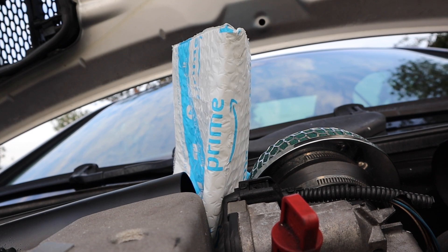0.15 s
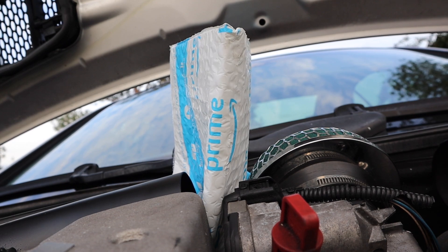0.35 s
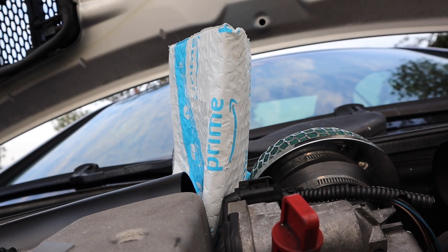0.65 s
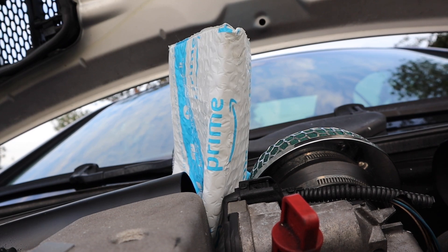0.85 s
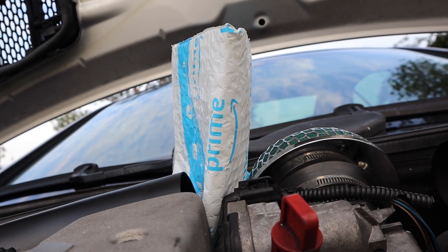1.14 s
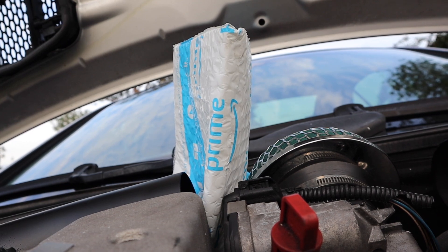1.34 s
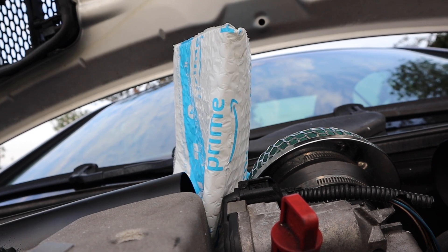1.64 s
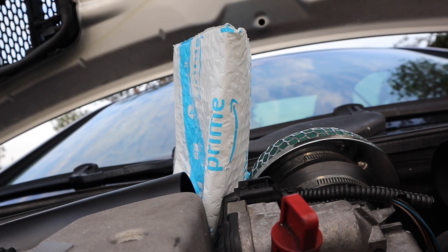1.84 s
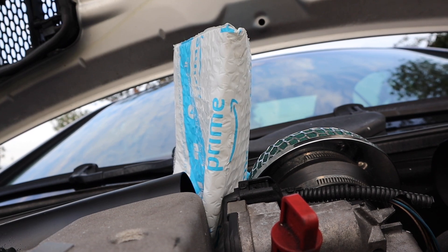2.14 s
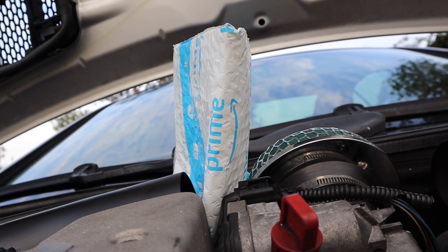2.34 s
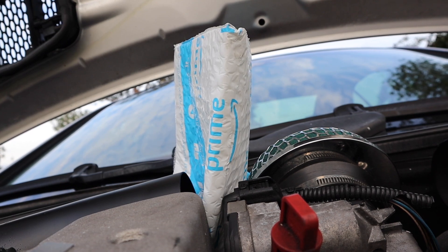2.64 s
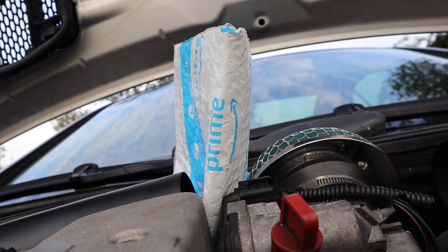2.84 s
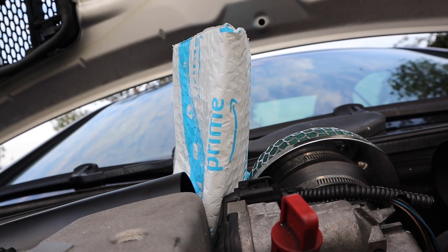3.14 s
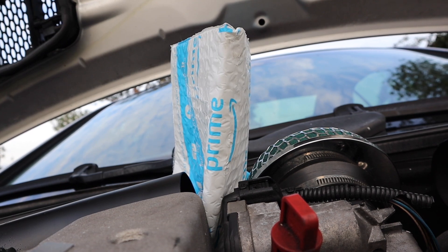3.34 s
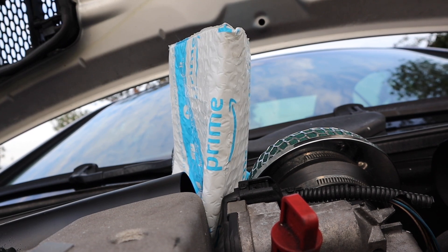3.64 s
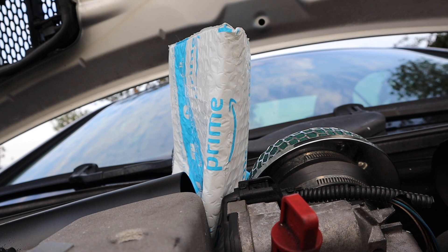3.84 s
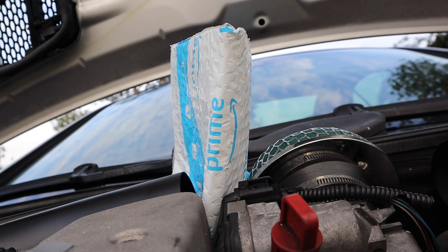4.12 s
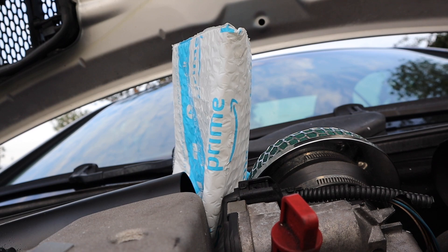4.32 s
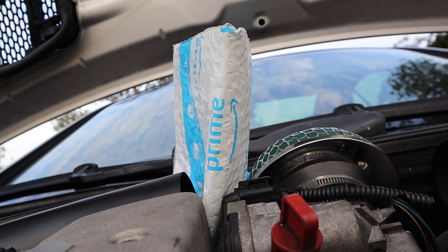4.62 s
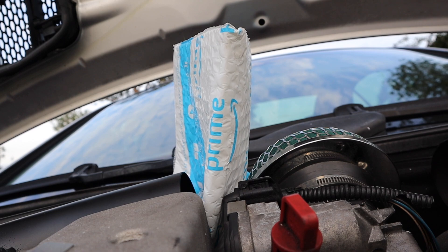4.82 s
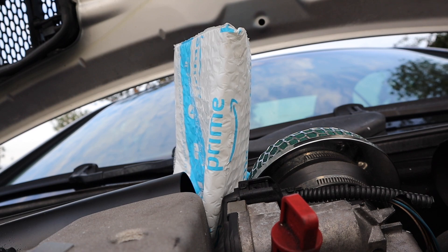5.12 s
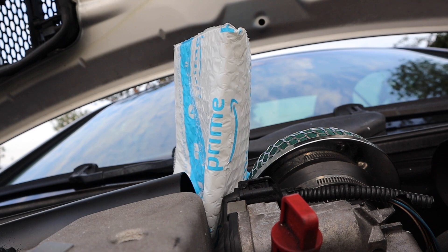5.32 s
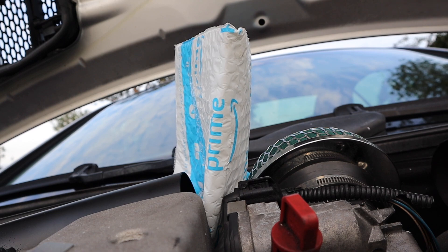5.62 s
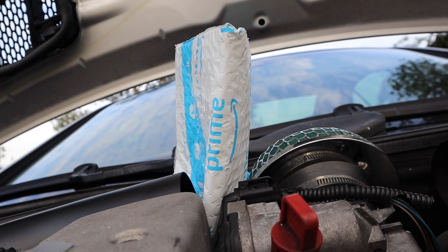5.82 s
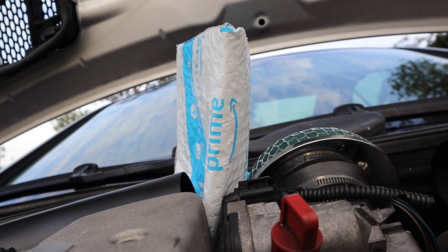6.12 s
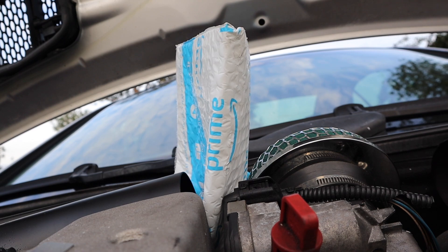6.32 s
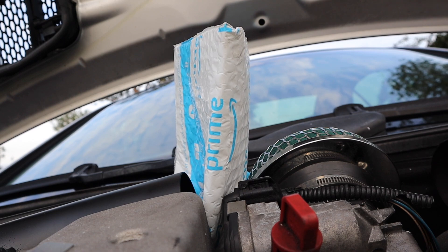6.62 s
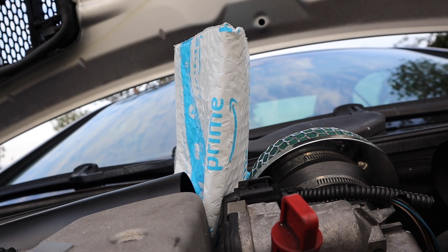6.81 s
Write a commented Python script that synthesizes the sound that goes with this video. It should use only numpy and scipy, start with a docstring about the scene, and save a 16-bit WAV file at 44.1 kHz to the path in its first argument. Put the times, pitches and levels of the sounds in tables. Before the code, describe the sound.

Blasts of airy blower roar with a thin blade whine start, sag and stop, separated by brief quiet outdoor gaps and trigger clicks.

```python
"""Leaf blower into a car's engine bay

An electric leaf blower is aimed into the front of a parked car, heard from the open engine bay.
It coasts down, is switched on again, runs, coasts and runs once more. Fan speed drives the filtered-noise
roar and the sine blade tones; noise bands make the bay boom and buffet the microphone, and whistles graze
the grille. The pauses bare trigger clicks, an insect's trilled noise and the hum of far traffic."""
import sys
import numpy as np
from scipy import signal
from scipy.fft import rfft, irfft
from scipy.io import wavfile
from scipy.ndimage import uniform_filter1d

SR = 44100
rng = np.random.default_rng(int(sys.argv[2]) if len(sys.argv) > 2 else 0)


def master(y):
    """Save y as 16-bit WAV."""
    cut = np.clip(np.atleast_2d(y).T, -1, 1)
    pcm = np.round(cut * 32767)  # scale
    wavfile.write(sys.argv[1], SR, pcm.astype(np.int16))


N = 307200
TIME = np.arange(N) / SR  # s
FREQ = np.maximum(np.fft.rfftfreq(N, 1 / SR), 1)  # Hz

FULL_HZ = 282  # shaft rate that counts as full speed
# trigger pulls, the first already let go: (switch-on [s], release [s], held shaft rate [Hz],
# controller whistle length [s], whistle [dB], blade-rate tone [dB], its octave [dB])
TRIGGER_PULLS = [(-2, -.214, 282, .2, -46, -38, -33), (.763, 2.82, 282.8, .19, -48, -41, -30.3),
                 (3.806, 6.905, 281.9, .22, -44, -35.3, -39)]
# the controller starts the fan gently, then pulls hard until air drag makes the speed settle
SOFT_HZ_PER_S, SOFT_S, HARD_HZ_PER_S, HARD_S, SETTLE_S = 590, .17, 900, .114, .128
# let go, the fan coasts against the air (COAST_S would halve its speed);
# after a delay the brake and friction stop it
COAST_S, BRAKE_AFTER_S, BRAKE_S, FRICTION_HZ = 1.055, .522, .185, 25

# how squarely the jet strikes the grille: (time [s], roar [dB], hiss [dB])
JET_AIM = [(0, 0, .8), (1.4, .5, 1.0), (2.05, 1, .4), (2.8, -.4, .6), (4.4, -.2, .8), (5.15, .7, .2),
           (5.75, 0, 0), (6.05, 3, 1.8), (6.24, 1.5, .6), (6.42, 6.5, 3.6), (6.57, 6.5, 3.4),
           (6.72, 4.3, 2.7), (6.97, 3.2, 3.3)]
# the nozzle swings closer to another part of the grille: (time [s], share [0-1])
NOZZLE_SWING = [(5.7, 0), (6.15, 0.1), (6.4, 0.94), (6.97, 0.96)]
# change of colour at that spot: (centre [Hz], width [Hz], gain [dB])
SWUNG_COLOUR = [(237, 107, -6.5), (1194, 81, 6), (1390, 730, -1), (1543, 96, 5.5), (1905, 320, -7.5),
                (2480, 160, -9), (3122, 120, -8), (3610, 460, 7), (4170, 170, 7), (5540, 350, -3),
                (8500, 550, -3.0)]
# air noise colour at full speed: (frequency [Hz], relative level per Hz [dB])
AIR_COLOUR = [(190.0, 1.5), (400.0, -1.07), (700.0, 1), (1000.0, -4), (1200.0, -11), (1500.0, -1.5),
              (2000.0, -6), (2400.0, -18.0), (3500.0, -13.5), (5000.0, -16), (7000.0, -12.5),
              (10000.0, -21.5), (12500.0, -26.5), (15500.0, -35.0)]
AIR_DB = -17
# air noise grows as a power of fan speed: (frequency [Hz], exponent)
AIR_GROWTH = [(250, 2.6), (600, 2.7), (950, 1.4), (1500, 1.15), (2000, 2.9), (4300, 2.05), (6000, 3.0),
              (9000, 3.5), (14000, 4.9)]
# resonances and notches of tube and engine bay: (centre [Hz], width [Hz], gain [dB])
BAY_MODES = [(294.8, 43.5, 9.5), (342, 21, 2.5), (406.6, 31, 6), (665, 44, -8), (801, 110, -4),
             (892, 28, 4.5), (1147, 59, -11), (1363, 47, -11), (1461, 130, 5), (1533, 56, -8),
             (1793, 59, -24), (1992, 560, 2.5), (2180, 50, -16), (2290, 57, -4.5), (2350, 510, 3.5),
             (2516, 80, 6.5), (2732, 160, 7), (3130, 55, 5.5), (3486, 70, -21), (3790, 61, -8.5),
             (4479, 28, 5), (4860, 98, 5.5), (5230, 230, 5), (5895, 910, 3.5), (6230, 44, -24),
             (7460, 280, -3.8), (7860, 330, -5.5), (9360, 150, 6.5), (9710, 350, 5.5), (10140, 150, 6.5)]
# the jet collapses below these shaft rates, the roar sooner than the hiss
ROAR_STALL_HZ, HISS_STALL_HZ = 116, 63
# jet and draught in the bay trail the fan by these times
JET_LAG_S, DRAUGHT_LAG_S = .009, .056

# draught on the microphone: (frequency [Hz], relative level per Hz [dB])
BUFFET_COLOUR = [(12, -12), (22, -6.5), (30, 0), (45, -4), (62, -10), (85, -17), (120, -18.5), (250, -58)]
# lowest resonance of the bay: (frequency [Hz], relative level per Hz [dB])
BOOM_COLOUR = [(70, -38), (100, -22), (125, -6), (145, 7.5), (160, -1), (180, -10), (240, -47.5)]
# strongest gusts on the microphone: (time [s], length [s], rise above the steady draught [dB])
STRONG_GUSTS = [(1.56, .22, 3.5), (5.28, .1, 9), (6.16, .36, 4)]
# after switch-on the cavity starts to boom first; the draught reaches the microphone later
BOOM_DELAY_S, BOOM_SPREAD_S = .23, .06
BUFFET_DELAY_S, BUFFET_SPREAD_S = .61, .075

# blade tones: (multiple of shaft rate, exponent of fan speed, gain per dB of hiss [dB],
# gain once the nozzle has swung [dB])
BLADE_TONES = [(13, 14, -1, 7), (26, 46, 3.2, 1.5), (39, 14, 0, -2)]
THIRD_DB = -44  # third blade harmonic
# tones swell as they sweep through a tube resonance:
# (multiple of shaft rate, centre [Hz], width [Hz], peak level [dB rms])
TUBE_SWELLS = [(26, 6030, 160, -41), (26, 6800, 500, -42), (13, 3335, 80, -27), (13, 3170, 190, -23.5),
               (13, 2790, 330, -33), (13, 2020, 340, -33.5), (13, 1530, 240, -34.5), (10, 2020, 150, -27.5),
               (10, 1000, 130, -45), (10, 2830, 120, -47)]
# airy whistles that follow the fan: (multiple of shaft rate, width [Hz], level at full speed [dB rms])
AIRY_WHISTLES = [(13, 50, -47), (17, 70, -46), (21, 110, -39), (23, 110, -42), (26, 70, -41)]

# outdoor background: (frequency [Hz], relative level per Hz [dB])
OUTDOOR_COLOUR = [(25, -17), (90, 5.5), (200, -14.5), (285, -5), (360, -9), (700, -13.5), (1500, -19),
                  (3000, -24), (7000, -29), (15000, -42)]
# a far vehicle gathers speed, then eases a little: (time [s], firing rate [Hz], level [dB])
FAR_VEHICLE = [(0, 59.3, -50), (.5, 67, -47), (.7, 76.7, -52), (.95, 82.5, -55), (3.5, 91.7, -61),
               (4, 88.55, -57), (6.97, 86.9, -60)]
# trigger and switch: (time [s], level [dB], ring [Hz], t60 [s], crack against the ring [dB])
TRIGGER_CLICKS = [(.688, -38, 5150, .04, -27), (.707, -49, 6500, .04, -14), (.759, -42, 2550, .05, -32),
                  (3.729, -40, 5200, .04, -24), (3.746, -46, 6520, .04, -12), (3.802, -40, 2550, .05, -35)]
# motor housing modes: (centre [Hz], width [Hz], gain [dB])
HOUSING_MODES = [(675, 130, -12), (980, 170, -8), (1490, 74, 3), (2130, 290, 1), (2510, 96, -0.5),
                 (3050, 510, -12), (4860, 1900, -21)]
# magnetic tones of the motor while it pulls hard:
# (multiple of shaft rate, centre [Hz], width [Hz], peak level [dB rms])
PULL_TONES = [(26, 2150, 150, -32), (26, 2480, 330, -31), (24, 2250, 350, -42), (26, 3200, 500, -37),
              (26, 1520, 200, -37), (26, 900, 400, -47.5), (26, 4500, 1500, -40), (39, 3000, 1500, -53),
              (39, 4900, 400, -41), (39, 6800, 2000, -47), (52, 6000, 3000, -55)]
WHISTLE_HZ = 10056  # switching tone of the controller
# the jet briefly whistles on an edge of the grille:
# (time [s], length [s], centre [Hz], width [Hz], level [dB])
EDGE_WHISTLES = [(4.3, .26, 4920, 160, -35), (6.03, .46, 5930, 200, -32.5)]
TOP_HZ = 15650  # upper limit of the sound


def undb(db):
    """Decibels to gain."""
    return np.exp(np.asarray(db) * np.log(10) / 20)


def unit(x):
    """Scale to rms 1."""
    return x / np.sqrt(np.mean(x ** 2))


def curves(table):
    """Each column of a timed table, sample by sample."""
    s, *columns = np.transpose(table)
    return [np.interp(TIME, s, column) for column in columns]


def over_hz(table, hz):
    """Read (Hz, value) points on a log-frequency axis."""
    knots_hz, value = np.transpose(table)
    return np.interp(np.log(hz), np.log(knots_hz), value)


def noise(db):
    """Noise of rms 1, coloured by a relative level at each frequency."""
    return unit(irfft(rfft(rng.standard_normal(N)) * undb(db), N))


def walk(rate):
    """Smooth random drift of rms 1, changing about rate times a second."""
    real, imag = rng.standard_normal((2, N // 64))  # only the lowest frequencies are needed
    fade = np.exp(-(FREQ[:len(real)] / rate) ** 2)
    return unit(irfft((real + 1j * imag) * fade, N))


def resonance(hz, width):
    """Response of one mode, gain 1 at its centre."""
    return 1 / (1 + 1j * (FREQ ** 2 - hz ** 2) / (FREQ * width))


def bumps(table):
    """Level in dB at each frequency from a set of resonances and notches."""
    return sum(db * np.exp(-(2 * (FREQ - hz) / width) ** 2) for hz, width, db in table)


def phase_of(hz):
    """Radians run through at a moving frequency."""
    return 2 * np.pi * np.cumsum(hz) / SR


def steadied(x, span_s):
    """Even out the slow swells of a noise."""
    return x / np.sqrt(uniform_filter1d(x ** 2, int(span_s * SR)) + 1e-6)


def trailing(x, lag_s):
    """Follow a control with some inertia."""
    keep = np.exp(-1 / (lag_s * SR))
    return signal.lfilter([1 - keep], [1, -keep], x, zi=[keep * x[0]])[0]


def swell(s, length):
    """A smooth rise and fall about a moment."""
    return np.exp(-(2 * (TIME - s) / length) ** 2)


def latest_pull():
    """The columns of the most recent trigger pull, sample by sample."""
    rows = np.array(TRIGGER_PULLS)
    return rows[np.searchsorted(rows[:, 0], TIME) - 1].T


def building(delay_s, spread_s):
    """Rise from 0 to 1 some time after each switch-on."""
    age = TIME - latest_pull()[0]
    return 1 / (1 + np.exp((delay_s - age) / spread_s))


def jet(shaft_hz, stall_hz):
    """Share of the jet that holds together at this fan speed."""
    return shaft_hz ** 4 / (shaft_hz ** 4 + stall_hz ** 4)


def swept(table, shaft_hz, turn, shimmer_db=1):
    """Shaft harmonics, each loud only while it passes a resonance."""
    out = 0
    for order, hz, width, db in table:
        passing = np.exp(-2 * ((order * shaft_hz - hz) / width) ** 2)
        out = out + np.sin(order * turn) * undb(db) * passing
    return np.sqrt(2) * out * undb(shimmer_db * walk(40))


def bay_echo(x, t60_s=0.11, wet_db=-7):
    """Close metal and plastic surfaces add a brief, dense ring."""
    age = TIME[:SR // 8]
    tail = rng.standard_normal(len(age)) * np.exp(-np.log(1000) * age / t60_s)
    return x + undb(wet_db) * signal.fftconvolve(x, tail / np.linalg.norm(tail))[:N]


def fan_speed():
    """Turns per second: each pull runs the fan up, holds it, lets it coast and brakes it."""
    shaft_hz = 0
    for on, off, held_hz, *_ in TRIGGER_PULLS:
        age = TIME - on
        soft = SOFT_HZ_PER_S * np.clip(age, 0, SOFT_S)
        ramp = soft + HARD_HZ_PER_S * np.clip(age - SOFT_S, 0, HARD_S)
        settling = np.exp(-np.maximum(age - SOFT_S - HARD_S, 0) / SETTLE_S)
        driven = held_hz + (ramp - held_hz) * settling
        coasting = driven / (1 + np.clip(TIME - off, 0, BRAKE_AFTER_S) / COAST_S)
        brake = np.exp(-np.maximum(TIME - off - BRAKE_AFTER_S, 0) / BRAKE_S)
        shaft_hz = np.maximum(shaft_hz, (coasting + FRICTION_HZ) * brake - FRICTION_HZ)
    return np.maximum(uniform_filter1d(shaft_hz, size=1100), 0)  # round the corners


def rotor(shaft_hz, wobble_hz=0.14, cogging_hz=3):
    """Shaft angle in radians; the rotor turns unevenly while it is slow."""
    slow = np.clip(1 - shaft_hz / FULL_HZ, 0, 1)
    return phase_of(shaft_hz + wobble_hz * walk(26) + cogging_hz * slow ** 2 * walk(167))


def air(shaft_hz, churn_db=0.3, flicker_db=0.52, low_edge_hz=185, ripple_db=1.96):
    """Turbulence coloured by tube and bay; each band grows with its own power of fan speed."""
    # many short reflections ripple the treble
    knots_hz = np.arange(2500, 16000, 35)
    ripple = ripple_db * np.interp(FREQ, knots_hz, rng.standard_normal(len(knots_hz)), left=0)
    low_cut = 10 * np.log10(1 + (low_edge_hz / FREQ) ** 10)
    rush = noise(over_hz(AIR_COLOUR, FREQ) + bumps(BAY_MODES) + ripple - low_cut)
    swung_rush = irfft(rfft(rush) * undb(bumps(SWUNG_COLOUR)), N)
    swing = np.clip(curves(NOZZLE_SWING)[0], 0, 1)
    spectrum = rfft((1 - swing) * rush + swing * swung_rush)
    speed_db = 20 * np.log10(np.maximum(shaft_hz, 1) / FULL_HZ)
    roar_db, hiss_db = curves(JET_AIM)
    churn = churn_db * walk(37)  # big eddies shake all bands together
    centres = np.geomspace(200, 14000, 12)  # Hz
    out = 0
    for hz, pick in zip(centres, np.eye(len(centres))):
        # overlapping bands that add back up to the whole
        band = irfft(spectrum * np.interp(np.log(FREQ), np.log(centres), pick), N)
        treble = over_hz([(1300, 0), (3000, 1)], hz)  # 0 is roar, 1 is hiss
        aim_db = (1 - treble) * roar_db + treble * hiss_db
        held = jet(shaft_hz, (1 - treble) * ROAR_STALL_HZ + treble * HISS_STALL_HZ)
        growth_db = over_hz(AIR_GROWTH, hz) * speed_db
        out = out + band * held * undb(growth_db + aim_db + churn + flicker_db * walk(13.5))
    return undb(AIR_DB) * out


def draught(shaft_hz, buffet_db=-22.5, boom_db=-23.2, breeze_db=-63, buffet_growth=1.2, boom_growth=1.3,
            stall_hz=112, gust_db=2.4, waver_db=1.9, per_roar=.6):
    """Air leaving the bay buffets the microphone and blows the cavity's lowest resonance, following the fan."""
    flow_hz = trailing(shaft_hz, DRAUGHT_LAG_S)
    flow, held = flow_hz / FULL_HZ, jet(flow_hz, stall_hz)
    strong_db = sum(db * swell(s, length) for s, length, db in STRONG_GUSTS)
    gusts_db = per_roar * curves(JET_AIM)[0] + gust_db * walk(7) + strong_db
    arrival = building(BUFFET_DELAY_S, BUFFET_SPREAD_S)
    pressure = held * arrival * flow ** buffet_growth * undb(buffet_db + gusts_db) + undb(breeze_db)
    buffet = steadied(noise(over_hz(BUFFET_COLOUR, FREQ)), span_s=0.21) * pressure
    boom = steadied(noise(over_hz(BOOM_COLOUR, FREQ)), span_s=0.12)
    boom = boom * held * building(BOOM_DELAY_S, BOOM_SPREAD_S) * flow ** boom_growth
    return buffet + boom * undb(boom_db + waver_db * walk(10))


def blades(shaft_hz, turn, flutter_db=1.9, wander_db=1.2, airy_growth=2.3, airy_per_hiss=.5):
    """Thirteen blades whine at full speed; on the way up and down their tones sweep the tube's resonances."""
    speed = np.clip(shaft_hz / FULL_HZ, 0, 1)
    hiss_db, swing = curves(JET_AIM)[1], curves(NOZZLE_SWING)[0]
    *_, blade_db, octave_db = latest_pull()
    out = bay_echo(swept(TUBE_SWELLS, shaft_hz, turn), t60_s=.04, wet_db=-15)
    levels_db = (blade_db, octave_db, THIRD_DB)
    for db, (order, steepness, per_hiss, swung_db) in zip(levels_db, BLADE_TONES):
        aim_db = per_hiss * hiss_db + swung_db * swing
        tone_db = db + aim_db + wander_db * walk(4) + flutter_db * (walk(29) - .5)
        out = out + np.sqrt(2) * np.sin(order * turn) * speed ** steepness * undb(tone_db)
    # blades chopping turbulent inflow widen shaft harmonics into narrow bands of noise
    for order, width, db in AIRY_WHISTLES:
        angle = order * turn
        band = walk(width) * np.cos(angle) + walk(width) * np.sin(angle)
        out = out + band * speed ** airy_growth * undb(db + airy_per_hiss * hiss_db)
    return out


def outdoors(floor_db=-54, insect_db=-62, insect_hz=8950, trill_hz=58):
    """Background rush, the hum of a far vehicle and an insect's thin, fast trill."""
    firing_hz, hum_db = curves(FAR_VEHICLE)
    hum_phase = phase_of(firing_hz * (1 + .05 * walk(12)))
    hum = np.sqrt(2) * np.sin(hum_phase) * undb(hum_db + 2.4 * walk(10))
    strokes = 1 + 0.48 * np.sin(phase_of(trill_hz * (1 + 0.028 * walk(5.4))))
    insect = noise(20 * np.log10(np.abs(resonance(insect_hz, 650) ** 2))) * strokes
    rush = noise(over_hz(OUTDOOR_COLOUR, FREQ))
    return undb(floor_db) * rush + hum + undb(insect_db) * insect


def trigger(rise_s=0.0036):
    """Short plastic clicks: one ring and a broad crack."""
    out = 0
    for s, db, hz, t60, crack_db in TRIGGER_CLICKS:
        ring = np.abs(resonance(hz, hz / 10)) ** 2
        body = ring + undb(crack_db) * np.abs(resonance(7500, 8000))
        age = np.clip(TIME - s, 0, 1)
        envelope = np.minimum(age / rise_s, 1) * np.exp(-np.log(1000) * age / t60)
        out = out + noise(20 * np.log10(body)) * envelope * undb(db)
    return out


def motor(shaft_hz, turn, buzz_db=-34.7, rise_s=0.046, buzz_s=0.11, pull_s=0.26, step_hz=420,
          sideband=0.13, sizzle_db=-55):
    """At switch-on uneven current steps rattle the housing; the controller whistles and the motor sings."""
    step_count = np.floor(np.cumsum(step_hz * (1 + 0.39 * walk(200))) / SR)
    steps = np.diff(step_count, prepend=0)
    drive = steps * rng.standard_normal(N) + 0.11 * rng.standard_normal(N)
    housing = sum(undb(db) * resonance(hz, width) ** 2 for hz, width, db in HOUSING_MODES)
    buzz = unit(irfft(rfft(drive) * housing, N))
    # the turning rotor modulates the switching tone
    modulation = 1 + sideband * (np.cos(6 * turn) + np.cos(12 * turn))
    whistle = np.sqrt(2) * np.sin(2 * np.pi * WHISTLE_HZ * TIME) * modulation
    sizzle = noise(over_hz([(2000, -8), (5000, -9), (7500, -5), (9800, 6), (11000, -20)], FREQ))
    singing = bay_echo(swept(PULL_TONES, shaft_hz, turn)) + undb(sizzle_db) * sizzle
    out = 0
    for s, _, _, length, whistle_db, *_ in TRIGGER_PULLS:
        age = np.maximum(TIME - s, 0)
        rattle = buzz * undb(buzz_db) * np.exp(-(age / buzz_s) ** 4)
        whistling = whistle * undb(whistle_db) * np.exp(-(age / length) ** 6)
        pulling = singing * np.exp(-(age / pull_s) ** 6)
        out = out + np.minimum(age / rise_s, 1) * (rattle + whistling + pulling)
    return out


def edge_whistles():
    """Rough, airy whistles that come and go as the jet grazes the grille."""
    out = 0
    for s, length, hz, width, db in EDGE_WHISTLES:
        whistle = noise(20 * np.log10(np.abs(resonance(hz, width)) ** 2))
        out = out + whistle * swell(s, length) * undb(db)
    return out


def scene():
    """Fan speed drives the whole blower; everything reaches both channels alike."""
    shaft_hz = fan_speed()
    turn = rotor(shaft_hz)
    wind = air(trailing(shaft_hz, JET_LAG_S)) + draught(shaft_hz) + edge_whistles()
    mono = wind + blades(shaft_hz, turn) + motor(shaft_hz, turn) + trigger() + outdoors()
    return np.array([mono, mono])


def record(dry):
    """Clip at full scale, then cut the top with a steep low-pass."""
    low_pass = signal.ellip(10, .1, 80, TOP_HZ, fs=SR, output="sos")
    return signal.sosfilt(low_pass, np.clip(dry, -1, 1))


dry = scene()
out = record(dry)
master(out)
```